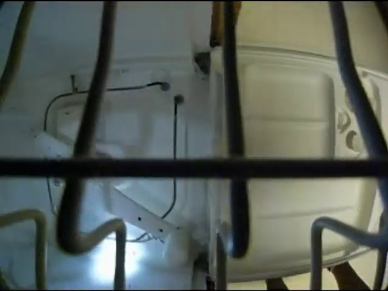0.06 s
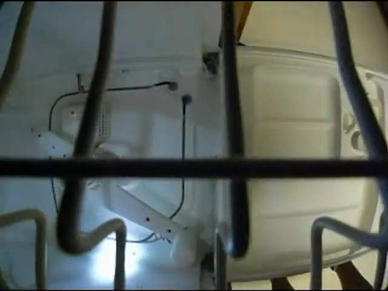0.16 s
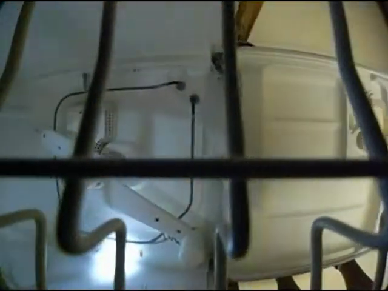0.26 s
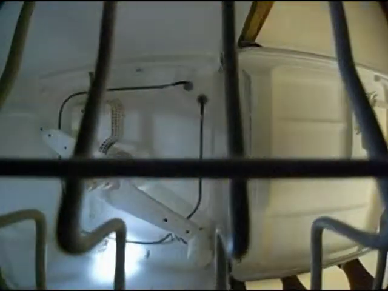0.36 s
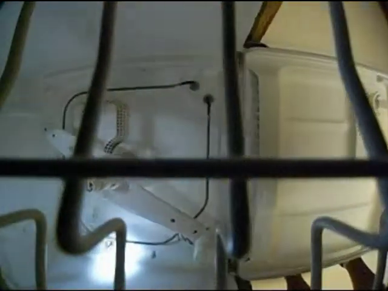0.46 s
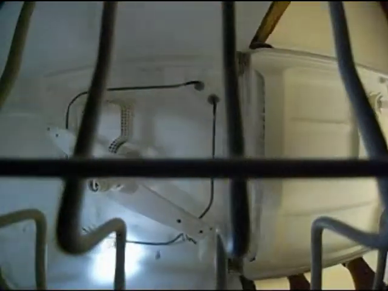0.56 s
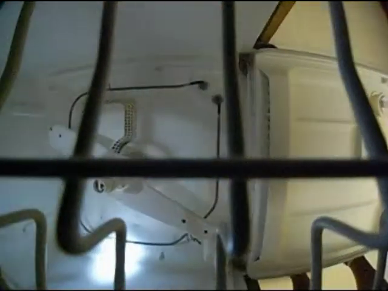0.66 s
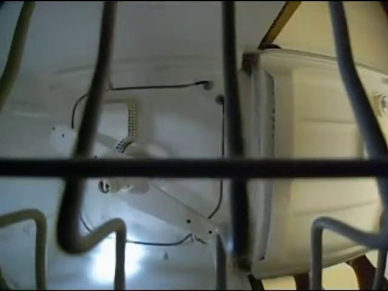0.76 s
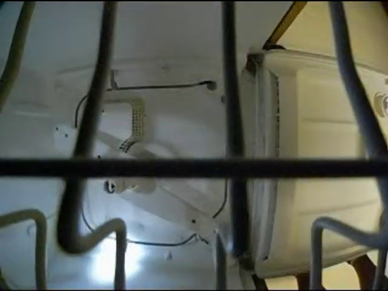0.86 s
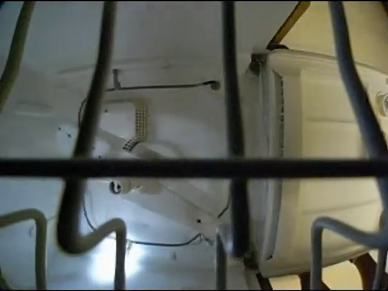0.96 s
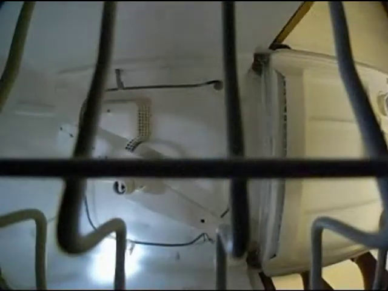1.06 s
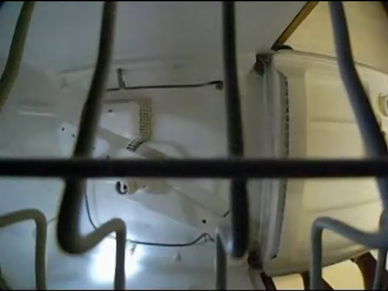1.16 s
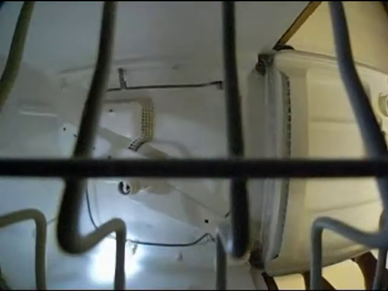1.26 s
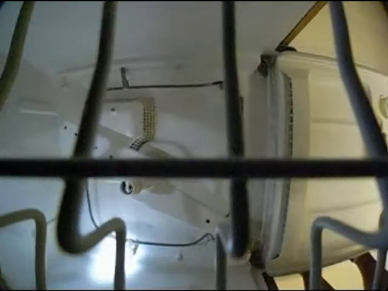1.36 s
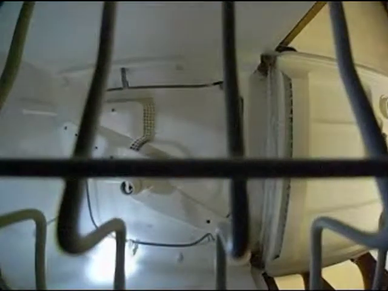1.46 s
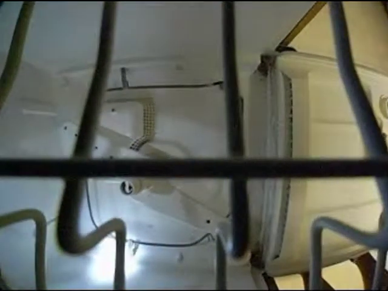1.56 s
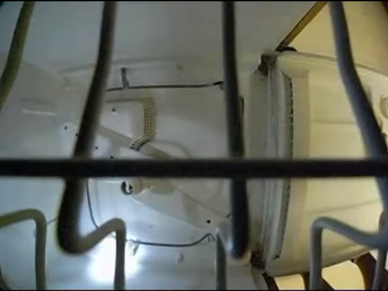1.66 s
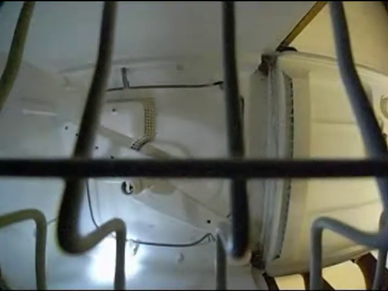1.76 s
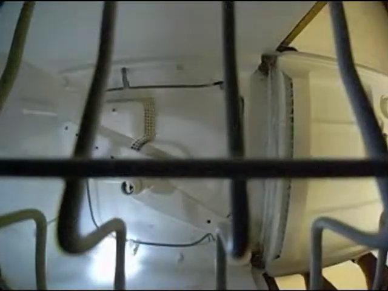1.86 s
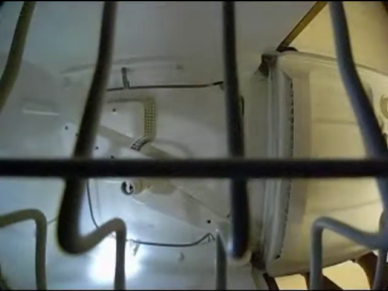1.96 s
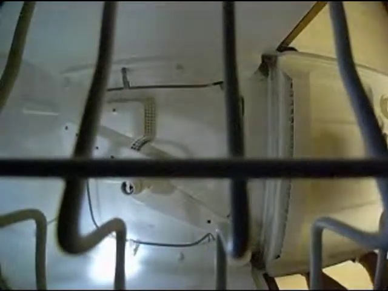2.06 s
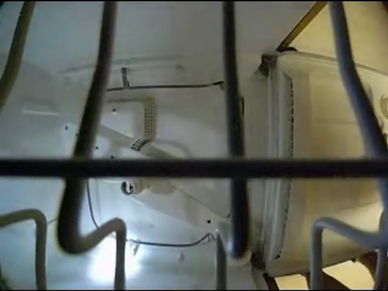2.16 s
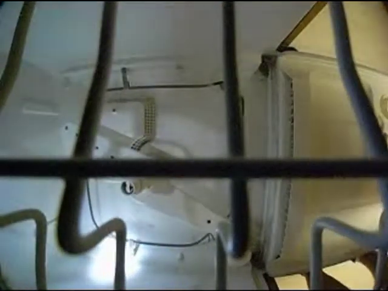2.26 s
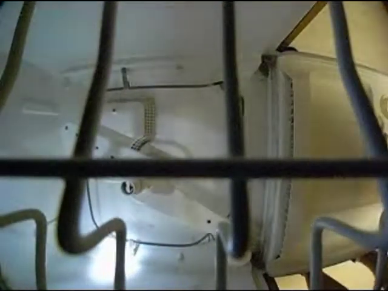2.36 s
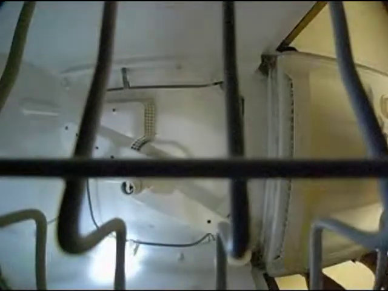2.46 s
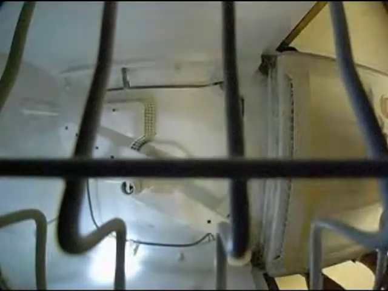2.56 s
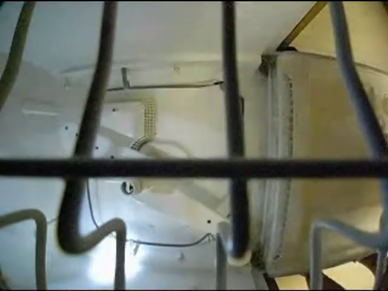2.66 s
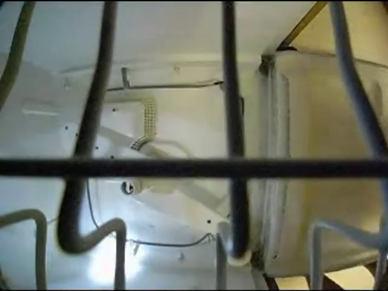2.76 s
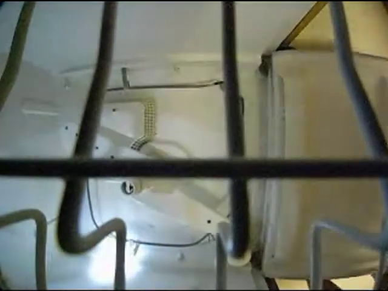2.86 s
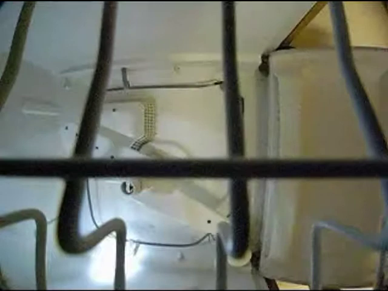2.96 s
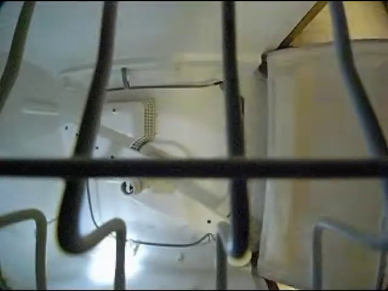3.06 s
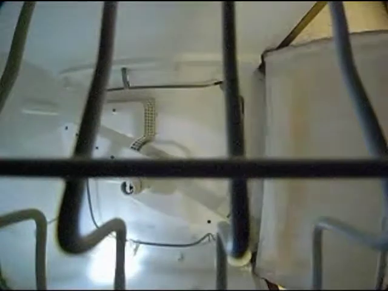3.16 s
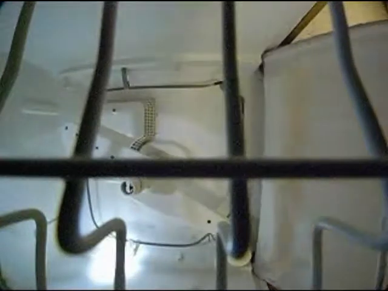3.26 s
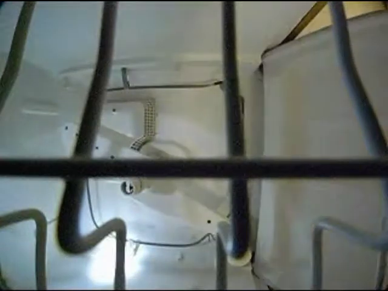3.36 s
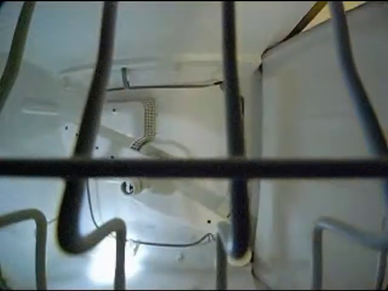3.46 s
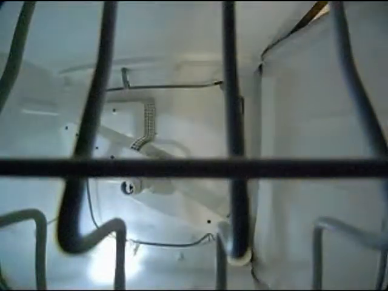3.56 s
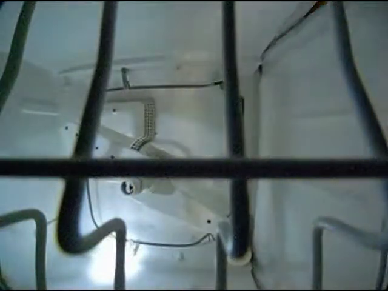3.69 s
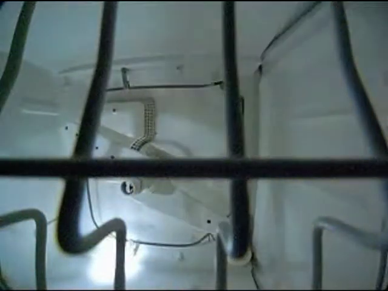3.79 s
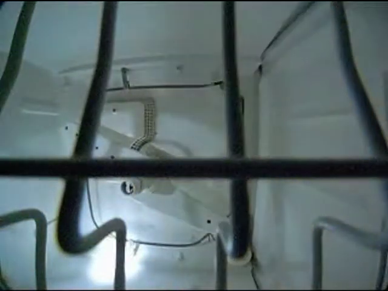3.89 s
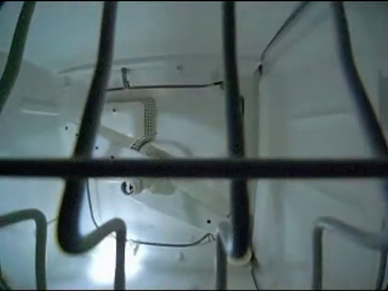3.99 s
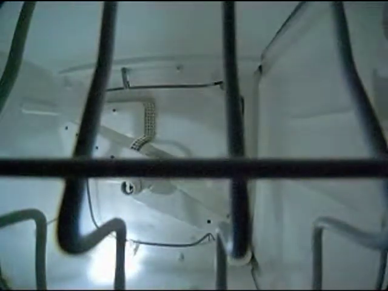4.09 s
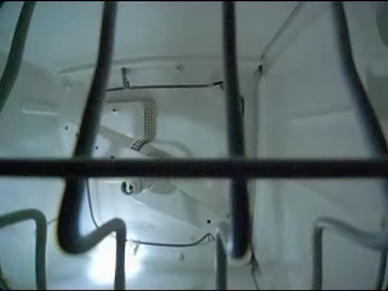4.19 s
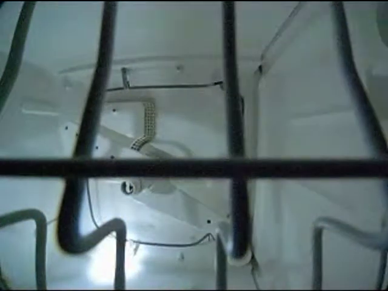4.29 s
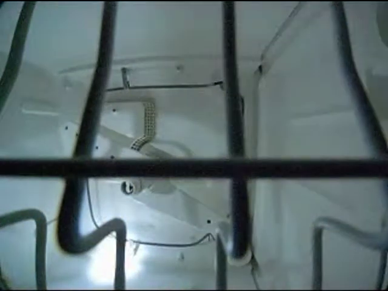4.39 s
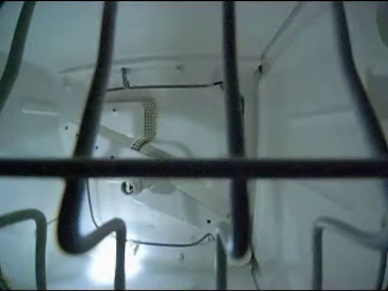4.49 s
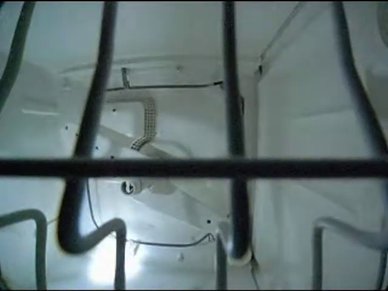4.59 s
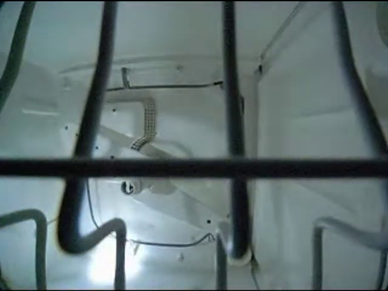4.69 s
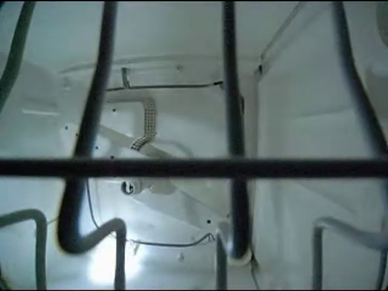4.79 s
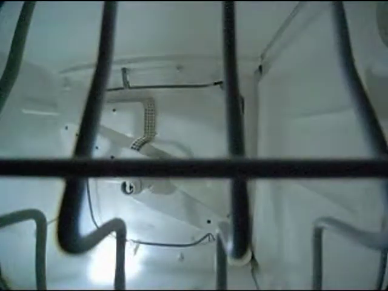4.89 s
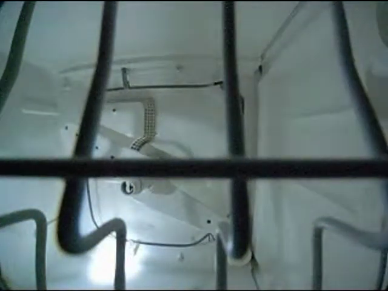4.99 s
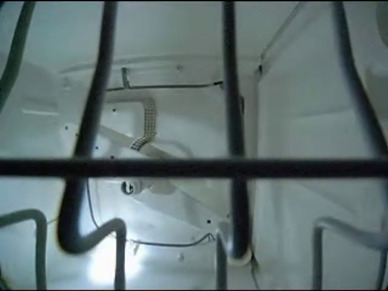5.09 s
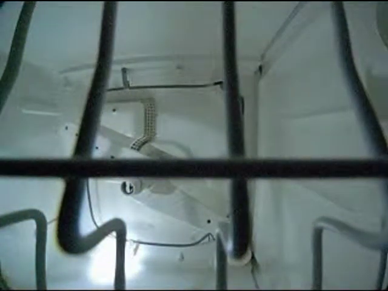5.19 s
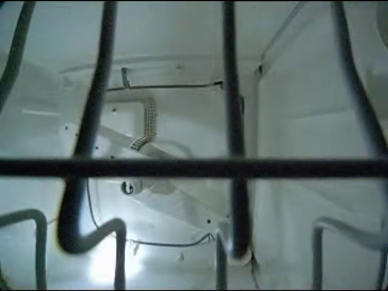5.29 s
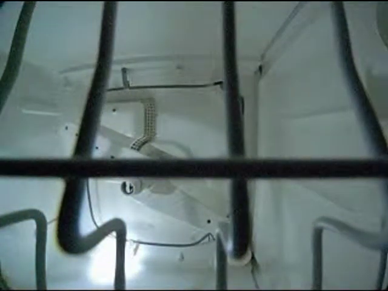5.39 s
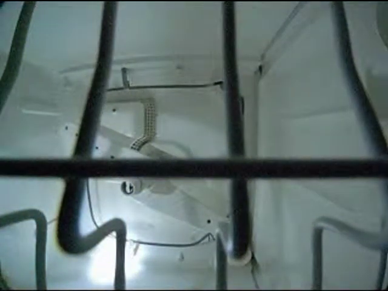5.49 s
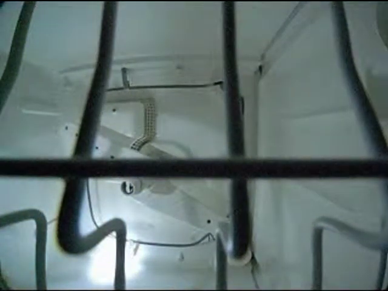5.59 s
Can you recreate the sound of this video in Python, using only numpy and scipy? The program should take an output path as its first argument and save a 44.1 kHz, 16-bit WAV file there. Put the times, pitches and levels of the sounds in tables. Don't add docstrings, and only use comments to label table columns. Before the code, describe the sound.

Hollow, boomy knocks and rattles of a rolling dishwasher rack, a near-silent pause, then a hard door clunk with plastic clicks and fading rattle.

```python
import sys
import numpy as np
from scipy import signal
from scipy.fft import rfft, irfft
from scipy.io import wavfile
from scipy.ndimage import map_coordinates

SR = 44100
rng = np.random.default_rng(int(sys.argv[2]) if len(sys.argv) > 2 else 0)


def to_linear_factor(level_db):
    exponent = np.asarray(level_db, float) / 20
    return 10 ** exponent


def dump_mix(stems):
    frames = np.atleast_2d(stems).T
    limited = np.clip(frames, -1, 1)
    pcm = np.round(limited * 32767).astype(np.int16)
    wavfile.write(sys.argv[1], SR, pcm)


N = 248724

# f/Hz, density/dB
HISS_SPECTRUM = [(25, -18), (125, -9), (327, -4), (383, -2), (484, -11.5), (717, -12), (1150, -15),
                 (2500, -18), (3500, -19.5), (4400, -23.5)]

# t/s, level/dB, f/Hz, t60/s
WIRE_TOUCHES = [(0.091, -26, 2670, 0.018), (0.3457, -30.5, 2460, 0.018), (0.355, -33, 2620, 0.02),
                (0.4884, -25.5, 2240, 0.039), (0.499, -21.5, 2610, 0.025), (0.556, -38, 2550, 0.016),
                (0.5798, -42.5, 2600, 0.025), (0.59, -30.5, 2420, 0.012), (0.9505, -31, 2470, 0.017),
                (0.798, -30.5, 2700, 0.04), (1.036, -30, 2700, 0.033), (1.04, -29, 2290, 0.039),
                (1.058, -35, 3080, 0.02), (1.288, -24, 3490, 0.03), (1.13, -43.5, 2700, 0.043),
                (1.309, -16.5, 1896, 0.014), (1.324, -21, 2450, 0.02), (1.5154, -32, 2490, 0.016),
                (0.568, -38, 2550, 0.018), (1.537, -38.5, 2230, 0.017), (1.7895, -40, 2500, 0.025),
                (4.441, -38, 2450, 0.031), (4.8638, -38.5, 2640, 0.028)]

# t/s, level/dB, wire share/dB, contact/ms
PLASTIC_TICKS = [(1.221, -30, -24, 1), (1.72, -14.5, -25, 0.29), (2.87, -40.5, -30, 0.4),
                 (4.189, -27, -18, 0.23), (4.2155, -20, -7.5, 0.22), (4.2193, -14, 2.5, 0.05),
                 (4.2228, -44, -18, 0.05), (4.319, -34.5, -32, 0.2), (4.351, -28, -25, 0.3),
                 (4.7584, -17, -50, 0.62), (4.851, -24, -42, 0.81), (4.8644, -31.5, -27, 0.46),
                 (4.8989, -21.5, -31, 0.58), (4.975, -29, -30, 1), (5.167, -49.5, -29, 0.65),
                 (0.023, -34, -33, 0.92), (0.13, -30.5, -28, 0.57), (0.38, -38, -30, 0.56),
                 (0.83, -32.5, -27, 1), (0.081, -35.5, -18, .3), (0.24, -39, -18, 0.24),
                 (4.228, -32.5, -13, .2), (4.883, -36, -31, .6), (4.928, -33, -29, 0.89),
                 (4.74, -28, -35, 0.92), (1.5542, -32.5, -28, 0.48), (4.214, -29, -10, 0.095),
                 (4.243, -35.5, -25, .4), (4.258, -34, -23, .5), (0.28, -30.5, -30, 0.75),
                 (0.437, -28, -27.5, 0.54), (4.78, -34, -35, .7), (4.82, -34, -30, .5),
                 (1.339, -29, -25, .5), (0.954, -32, -25, 0.69), (0.468, -31.5, -12, .3),
                 (1.389, -30, -15, .3), (0.411, -35, -10, .2), (0.792, -36, -4, .2)]

# t/s, level/dB, t60/s, f/Hz (centre)
RUNNER_SKIDS = [(4.2155, -18.5, 0.065, 1900), (0.405, -25.5, 0.25, 3100), (0.466, -28.5, 0.18, 3000),
                (0.789, -27, 0.19, 2790), (1.028, -28.5, 0.28, 2640), (1.241, -41, 0.37, 2880),
                (1.284, -22.5, 0.17, 3440), (1.291, -28, 0.39, 2440), (1.382, -27, 0.053, 2890),
                (1.557, -31, 0.31, 2010), (1.689, -43, 0.16, 1900), (4.148, -26, 0.35, 1150),
                (4.184, -26.5, 0.083, 2510), (4.2185, -25, 0.05, 2200), (4.640, -31.5, 0.25, 2700),
                (4.656, -32.5, 0.24, 1100), (4.713, -40, 0.14, 2780), (4.776, -34.5, 0.8, 1200),
                (4.88, -40, 0.18, 1300), (4.975, -44, 0.25, 1200), (4.235, -35.5, 0.65, 1250),
                (4.641, -34, .2, 1640), (4.77, -39.5, 0.6, 1620), (4.976, -45, 0.16, 1630),
                (4.149, -33, 0.19, 3600), (4.352, -38, 0.53, 1470), (4.995, -36, 0.5, 870),
                (0.407, -33.5, .2, 2530), (0.436, -31.5, .15, 2700), (0.488, -31.5, 0.17, 2300),
                (0.123, -35, .15, 2230), (4.7, -35.5, 0.37, 1000), (4.259, -44, 0.15, 2510),
                (0.79, -27, .25, 3410), (0.82, -37.5, .2, 2300), (1.032, -31.5, 0.18, 2110),
                (1.047, -35.5, 0.12, 3170), (4.79, -37, .6, 1010), (4.299, -31.5, 0.92, 900)]

# f/(skid centre), width/Hz
SKID_WIRES = [(.8, 120), (1.0, 120), (1.23, 150)]

# t/s, f/Hz, glide/(Hz per s), roughness/(0-1)
PANEL_RINGS = [(1.4, 80, 0, .2), (1.58, 208, 0, .3), (1.75, 62, 0, .2), (1.86, 404, 0, .1),
               (1.87, 298, 20, .9), (1.76, 258, 0, .8), (2.39, 123, 0, .2), (2.6, 123, 0, .3),
               (2.64, 215, 0, .5), (3.21, 125, 0, .2), (4.176, 62, 0, .2), (5.345, 385, 300, .1),
               (5.34, 345, 0, .3), (0.088, 375, 0, .2), (1.379, 362, -300, .1), (0.6, 590, 0, .4),
               (1.287, 372, -1900, .1), (1.33, 350, 0, .2), (1.06, 400, -150, .3), (1.032, 300, 0, .2),
               (1.033, 560, 0, .3), (1.57, 358, 100, .1), (1.62, 405, 150, .2), (1.575, 570, 0, .2),
               (1.765, 450, 0, .3), (1.375, 215, 200, .2), (1.03, 125, 0, .2), (0.485, 370, 0, .2),
               (4.187, 410, 0, .2), (5.17, 420, 0, .5), (-0.0062, 190, 0, .1), (0.41, 380, 0, .3),
               (0.055, 250, 0, .2), (4.70, 330, 0, .3), (4.225, 200, 0, .3), (1.62, 860, 0, .3),
               (1.29, 1110, 0, .2), (1.288, 570, 0, .2), (4.285, 390, 0, .4), (4.2, 300, 0, .3),
               (0.795, 375, 0, .4), (0.792, 170, 0, .3), (3.43, 310, 0, .3), (4.87, 400, 0, .3),
               (4.863, 1650, 0, .4), (4.976, 1640, 0, .5), (4.66, 1250, -1500, .5), (1.745, 860, 0, .4),
               (4.71, 1050, 0, .6), (4.192, 2150, 0, .5)]

# level/dB, t60/s, rise/s
RING_SHAPES = [(-17.5, 0.78, 0.062), (-20, 0.88, 0.025), (-34.5, 1.202, .02), (-37, 1.8, 0.079),
               (-36.5, 2.04, 0.025), (-34.5, 2.2, 0.081), (-34.5, 0.42, 0.023), (-35, 0.5, .015),
               (-27.5, 0.42, 0.023), (-33.5, 0.39, 0.023), (-19.5, 0.76, 0.016), (-22, 0.16, 0.024),
               (-37, 0.25, 0.047), (-9, 0.25, 0.014), (-8, 0.12, 0.0033), (-28.5, .4, 0.014),
               (-7, 0.32, 0.0035), (-12.5, 0.29, 0.0064), (-18.5, 0.61, 0.012), (-12, 0.13, 0.0055),
               (-25, 0.26, .006), (-7.5, 0.19, 0.0045), (-15.5, 0.3, 0.0082), (-17, 0.13, 0.0041),
               (-15.5, 0.15, 0.0085), (-18.5, 0.14, 0.0091), (-7, 0.13, 0.0054), (-14, 0.14, 0.0038),
               (-8, 0.15, 0.0017), (-33.5, 0.18, 0.011), (-10.5, 0.12, 0.0023), (-13.5, 0.32, 0.003),
               (-14.5, 0.11, 0.0047), (-22, 0.16, 0.007), (-18.5, 0.42, 0.013), (-28, 0.27, 0.0048),
               (-29.5, 0.14, 0.006), (-18, 0.12, 0.0048), (-18.5, 0.33, 0.012), (-23.5, 0.24, 0.0073),
               (-21, 0.56, 0.011), (-11, .2, 0.0054), (-46, 1, 0.025), (-21.5, 0.38, 0.0087),
               (-36.5, 0.071, 0.0027), (-40, 0.093, 0.0032), (-41, 0.18, .006), (-30.5, 0.2, 0.007),
               (-41, 0.25, .01), (-32.5, 0.042, 0.0036)]

# f/Hz, width/Hz, level/dB
CABINET_MODES = [(53.5, 38.6, -6), (78.6, 24.7, -4), (131.6, 25.3, -4.5)]

# f/Hz, width/Hz, level/dB
TUB_MODES = [(166.4, 32.7, -6.5), (217.6, 36.3, -2), (276.5, 33.4, -3.5), (303, 36, -3), (379, 29.2, -1),
             (408.3, 34, -0.5), (438.2, 39, -3), (507, 54.4, -8.5)]

# f/Hz, width/Hz, level/dB
PANEL_MODES = [(570.4, 28.7, 8), (650, 210, 13), (811, 40, 1), (852, 79, -0.5), (1017, 43.5, -7),
               (1111, 41, -8.5), (1280, 99, -4), (1509, 59, -11), (1630, 82, -12)]

# f/Hz, width/Hz, level/dB
WIRE_MODES = [(1800, 450, -18), (2256, 120, 12.5), (2670, 35, 1.5), (3240, 570, 14.5), (3766, 90, -0.5)]

# f/Hz, level/dB, t60/s
PLASTIC_MODES = [(840, -2, 0.03), (950, 5, 0.024), (1336, 2.5, 0.053), (1675, -2, 0.052),
                 (2098, -1.5, 0.047), (2526, -8, 0.038), (2700, -4.5, 0.021)]

# t/s, level/dB, weight/dB, hardness/dB
ROLLING = [(0.0, -19, 6.5, 1.5), (0.08, -13.5, -6, 1.5), (0.14, -17, 0, 4), (0.2, -17.5, -4.5, -2),
           (0.32, -19, 1.5, 2), (0.4, -19, 2, -1), (0.49, -16.5, 0, 5), (0.56, -22.5, -2.5, 4),
           (0.67, -25.5, -1, -3.5), (0.79, -26.5, -3.5, -5), (0.9, -81.5, -6, -2)]

# t/s, level/dB, t60/s, weight/dB, hardness/dB
RACK_JOLTS = [(0.792, -16, 0.85, 1, 0.5), (0.88, -29.5, 0.84, 6, -2.5), (0.943, -26, 0.55, -6, 8.5),
              (1.026, -12.5, 0.69, -6, 0), (1.22, -27, 0.82, -5, -1), (1.283, -11, 0.48, -3, 0),
              (1.329, -18.5, 0.55, 0.5, 4), (1.377, -16, 0.57, -7, 6), (1.5, -24, 0.72, -10, -13),
              (1.553, -15.5, 0.33, -12, 5), (1.575, -14.5, 0.22, -18, 5), (1.617, -17, 0.66, -7, 0.5),
              (1.693, -17, 0.58, -5, 4.5), (1.748, -23.5, 0.35, 3, 1.5), (1.9, -36.5, 0.32, 8, 8)]

# t/s, level/dB, t60/s, weight/dB, hardness/dB
DOOR_JOLTS = [(1.999, -47, 4.4, 0, -2), (2.389, -44, 2.2, 6.5, -1.5), (2.605, -39, 1.2, 5, 8),
              (2.624, -37, 1.2, 0, 0), (2.86, -43, 3.1, 0.5, 2.5), (2.98, -41, 0.92, -1, -7),
              (3.22, -44.5, 1.9, -4, -10), (3.439, -46, 0.69, -11, 5), (3.699, -59.5, 2.5, 9.5, 2),
              (4.153, -36, 0.52, -11, 18), (4.171, -18, 0.6, -7, 10.5), (4.185, -12, 0.18, 0.5, -7),
              (4.23, -21, 1.24, 3, 2), (4.309, -23.5, 1.2, -13, 6), (4.43, -48, 1, -6, -2),
              (4.637, -32.5, 1.5, -15, 2), (4.702, -23.5, 1.4, -1, 4.5), (4.75, -21.5, 0.82, -18, 2.5),
              (4.857, -25.5, 1.04, 3, 9.5), (4.95, -30.5, 0.77, 0, -5), (5.058, -25.5, 0.13, -2, -2),
              (5.16, -45.5, 0.53, 4, 7), (5.326, -41.5, 0.74, -1.5, 5), (5.45, -48, 7.2, -3, 0)]

# t/s, level/dB, panel share/dB, push/ms
ROLLER_KNOCKS = [(0.002, -0.5, -23, 0.52), (0.02, -7.5, -15, 0.76), (0.047, 5, -40, 1.36),
                 (0.059, -4, -38, 2.1), (0.078, -7, -12, 0.66), (0.127, -9, -5.5, 2),
                 (0.189, -3, -25, 0.47), (0.248, -1, -21, 2.1), (0.299, -7, -23, 0.96),
                 (0.346, 0.5, -15.5, 1.4), (0.383, -2, -26, 1.1), (0.412, 3.5, -35, 0.78),
                 (0.44, -3.5, -8.5, 1.3), (0.468, -5, -4, 0.63), (0.486, 3, -21, 1.6),
                 (0.498, 1.5, -17.5, 0.65), (0.53, -2.5, -20, 1.7), (0.069, -1.5, -31, 0.9),
                 (0.1, -6.5, -16, 1.2), (0.14, -4, -15, 0.94), (0.165, -8.5, -22, 1.1),
                 (0.22, -4, -25, 0.98), (0.275, -11, -13, 1.1), (0.425, -9, -21, 0.91),
                 (0.512, -10, -16, 0.95), (0.591, -2.5, -44, 0.88)]

# t/s, level/dB, panel share/dB, push/ms
STOP_KNOCKS = [(0.791, 1, -30.5, 0.49), (0.812, -16, -14, 0.59), (0.825, 4, -16, 2.96),
               (0.843, -2, -36, 2.3), (0.884, -8.5, -40, 0.46), (0.952, -15, -10, 1.3),
               (1.031, 5, -16, 1.7), (1.045, 4.5, -14, 1.15), (1.095, -11, -19, 0.94),
               (1.225, -7.5, -11, 2.7), (1.288, 6, -12.5, 2.8), (1.3, 6.5, -22, 0.7), (1.315, -6, -30, 1.8),
               (1.336, 2, -19, 1.4), (1.35, -20, -35, 1.7), (1.38, 7, -19, 1.1), (1.501, -9, -50, 1),
               (1.555, 1, -22, 0.74), (1.581, 5, -17, 1.3), (1.619, -1, -38, 1.4), (1.637, -5, -19, 1.9),
               (1.689, -7, -8.5, 1.4)]

# t/s, level/dB, panel share/dB, push/ms
DOOR_KNOCKS = [(2.617, -10, -21, 3.3), (2.678, -14.5, -24, 2.3), (2.907, -21, -22, 3.3),
               (4.173, -2.5, -25, 0.67), (4.187, 6, -12, 1.38), (4.203, -14, -25, 9),
               (4.228, 8.5, -20, 5.1), (4.255, -24, -12, 2.3), (4.278, -0.5, -38, 4), (4.319, -4, -21, 3.2),
               (4.348, -5, -33, 2.1), (4.437, -32, -16, 0.5), (4.706, -5, -38, 1.4), (4.755, -5, -13, 4),
               (4.781, -24, -5, 1.9), (4.83, -7.5, -20, 0.65), (4.871, -22, -24, 0.92),
               (4.898, -19.5, -2, 2.7), (4.952, -31, -20, 0.5), (5.0, -21, -8, 1.1), (5.081, -14, -18, 2.1),
               (5.17, -30, 1, 3.6), (5.344, -40, -26, 2.3), (5.365, -17.5, -35, 0.98)]


def rms_one(x):
    return x / np.sqrt(np.mean(x ** 2) + 1e-20)


def band(x, low_hz, high_hz):
    return signal.sosfilt(signal.butter(2, [low_hz, high_hz], "band", fs=SR, output="sos"), x)


def resonate(x, hz, width_hz):
    radius = np.exp(-np.pi * width_hz / SR)
    angle = 2 * np.pi * hz / SR
    return signal.lfilter([0, np.sin(angle)], [1, -2 * radius * np.cos(angle), radius * radius], x + 1e-18)


def body(force, modes):
    out = 0
    for k, (hz, width_hz, db) in enumerate(modes):
        out = out + (-1) ** k * to_linear_factor(db) * resonate(force, hz, width_hz)
    return out


def strike(times, levels_db, modes, push_ms):
    out = np.zeros(N)
    scatter_db = 2.5 * rng.standard_normal((len(times), len(modes)))
    for k, (hz, width_hz, mode_db) in enumerate(modes):
        force = np.zeros(N + 2000)
        for s, level_db, ms, uneven_db in zip(times, levels_db, push_ms, scatter_db[:, k]):
            push = np.hanning(max(round(ms * SR / 1000), 1) + 2)[1:-1]
            i = round(s * SR)
            force[i:i + len(push)] += to_linear_factor(level_db + mode_db + uneven_db) * push / push.sum()
        out += (-1) ** k * resonate(force[:N], hz, width_hz)
    return out


def hiss():
    hz = np.fft.rfftfreq(N, 1 / SR) + 1
    point_hz, point_db = np.transpose(HISS_SPECTRUM)
    shape_db = np.interp(np.log(hz), np.log(point_hz), point_db)
    noise = irfft(rfft(rng.standard_normal(N)) * to_linear_factor(shape_db), N)
    return to_linear_factor(-51.5) * rms_one(noise)


def wires():
    out = np.zeros(N)
    t = np.arange(2600) / SR
    for s, db, hz, t60 in WIRE_TOUCHES:
        ring = np.sin(2 * np.pi * hz * t) + 0.5 * np.sin(2 * np.pi * hz * 1.05 * t)
        rough = 0.6 * rms_one(band(rng.standard_normal(len(t)), hz / 1.15, hz * 1.15))
        onset = 1 - np.exp(-t / 0.0017)
        fade = to_linear_factor(db - 1.5 - 60 * t / np.clip(t60, 0.005, 0.04))
        i = round(s * SR)
        out[i:i + len(t)] += fade * onset * (ring + rough)
    return out


def ticks():
    s, db, wire_db, contact_ms = np.transpose(PLASTIC_TICKS)
    plastic = [(hz, np.log(1000) / np.pi / (0.68 * t60), mode_db) for hz, mode_db, t60 in PLASTIC_MODES]
    damped_wires = [(hz, max(width_hz, 60) * 1.8, mode_db) for hz, width_hz, mode_db in WIRE_MODES]
    dull = strike(s, db - 4.0, plastic, contact_ms)
    bright = strike(s, db + wire_db - 13.5, damped_wires, 0 * s)
    return dull + bright


def skids():
    out = np.zeros(N + 8000)
    t = np.arange(8000) / SR
    grip = np.minimum(t / 0.0022, 1)
    for s, db, t60, hz in RUNNER_SKIDS:
        uneven_db = 2.2 * rng.standard_normal(len(t) // 40).repeat(40)
        grit = rng.standard_normal(len(t)) * to_linear_factor(uneven_db)
        ring = rms_one(sum(resonate(grit, hz * multiple, width_hz) for multiple, width_hz in SKID_WIRES))
        rasp = rms_one(band(grit, hz / 1.5, hz * 1.5))
        fade = to_linear_factor(db - 12 - 60 * t / max(t60, 0.02))
        out[round(s * SR):][:len(t)] += fade * grip * rms_one(rasp + 0.9 * ring)
    return out[:N]


def rings():
    out = np.zeros(N + 2 * SR)
    t = np.arange(SR) / SR
    for (s, hz, glide, rough), (db, t60, rise_s) in zip(PANEL_RINGS, RING_SHAPES):
        wander = rng.standard_normal((2, 32))
        strength = np.interp(t * 30, np.arange(32), wander[0])
        phase = np.interp(t * 30, np.arange(32), wander[1]) - wander[1, 0]
        fade = to_linear_factor(db - 60 * t / np.clip(t60, 0.05, 1.8))
        swell = (1 - np.exp(-t / max(rise_s, 0.002))) * fade
        turns = np.cumsum(np.maximum(hz + glide * t, hz / 2)) / SR
        tone = np.sin(2 * np.pi * turns + rough * phase)
        out[SR + round(s * SR):][:SR] -= swell * to_linear_factor(3 * rough * strength) * tone
    return out[SR:SR + N]


def grains(per_s, spread_db):
    sizes = to_linear_factor(spread_db * np.minimum(rng.exponential(1, N), 4)) * rng.choice([-1, 1], N)
    return sizes * (rng.random(N) < per_s / SR)


def chatter(part_db, rise_s, lasts, weight, hardness):
    t = np.arange(0, N / SR, 0.001)
    roll_s, roll_db, heavy_db, hard_db = np.transpose(ROLLING)
    power = to_linear_factor(np.interp(t, roll_s, roll_db + weight * heavy_db + hardness * hard_db)) ** 2
    for s, db, t60, heavy_db, hard_db in RACK_JOLTS + DOOR_JOLTS:
        since = np.maximum(t - s, 0)
        fall_db = 60 * since / (lasts * max(t60, 0.05))
        rise = np.minimum(since / rise_s, 1)
        jolt = to_linear_factor(db + weight * heavy_db + hardness * hard_db - fall_db) * rise
        power = power + jolt ** 2
    return part_db + np.interp(np.arange(N) / SR, t, 10 * np.log10(power))


def driven(force, gain_db, modes, low_hz, high_hz):
    lead_in = 4000
    unit = np.sqrt(np.mean(band(body(force, modes), low_hz, high_hz) ** 2))
    pushed = np.concatenate([force[-lead_in:] * to_linear_factor(gain_db[0]), force * to_linear_factor(gain_db)])
    return band(body(pushed, modes), low_hz, high_hz)[lead_in:] / unit


def shaking():
    tub_db = chatter(0, rise_s=0.0034, lasts=1, weight=0, hardness=0)
    cabinet_db = chatter(-5.5, rise_s=0.017, lasts=0.78, weight=1, hardness=0)
    panel_db = chatter(-17.5, rise_s=0.0034, lasts=0.86, weight=0, hardness=1)
    scrape_db = chatter(-37, rise_s=0.0034, lasts=0.56, weight=0, hardness=0.77)
    shared = rms_one(grains(900, spread_db=2.2))
    tub_force = shared + 0.79 * rms_one(grains(1500, spread_db=0.5))
    cabinet_force = grains(300, spread_db=3.0)
    panel_force = shared + 1.04 * rms_one(grains(1500, spread_db=4.5))
    scrape_force = 0.3 * shared + rms_one(grains(2100, spread_db=3.0))
    tub = driven(tub_force, tub_db - 4, TUB_MODES, 169, 630)
    cabinet = driven(cabinet_force, cabinet_db, CABINET_MODES, 24, 200)
    panel = driven(panel_force, panel_db, PANEL_MODES, 652, 1600)
    scrape = driven(scrape_force, scrape_db, WIRE_MODES, 2000, 4500)
    return tub + cabinet + panel + scrape


def knocks():
    s, db, panel_db, push_ms = np.transpose(ROLLER_KNOCKS + STOP_KNOCKS + DOOR_KNOCKS)
    push_ms = np.clip(push_ms, 0.3, 8)
    tub = strike(s, db - 14.0, TUB_MODES, push_ms)
    cabinet = strike(s, db - 23, CABINET_MODES, 3 * push_ms)
    panel = strike(s, db + panel_db - 15.5, PANEL_MODES, 0.24 * push_ms)
    return tub + cabinet + panel


def scene():
    mix = hiss() + wires() + ticks() + skids() + rings() + shaking() + knocks()
    return mix[None]


def roll_off(x):
    return signal.sosfilt(signal.butter(12, 13000, fs=SR, output="sos"), x)


def record(dry):
    sample_hz = 8000
    t = np.arange(N) / SR
    low = signal.sosfilt(signal.butter(2, 35, "high", fs=SR, output="sos"), dry[0])
    steep = signal.cheby2(10, 50, 4900, fs=SR, output="sos")
    low = signal.sosfilt(steep, low, zi=signal.sosfilt_zi(steep) * low[0])[0]
    low = 1.6 * np.tanh(low / 1.6)
    sample_s = np.arange(int(t[-1] * sample_hz) + 2) / sample_hz
    samples = map_coordinates(low, [sample_s * SR], order=3, mode="nearest")
    mix = np.interp(t, sample_s, samples)[None]
    return roll_off(mix)


dry = scene()
out = record(dry)
dump_mix(out)
```